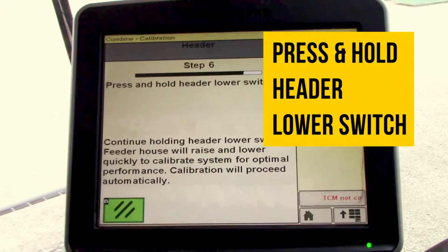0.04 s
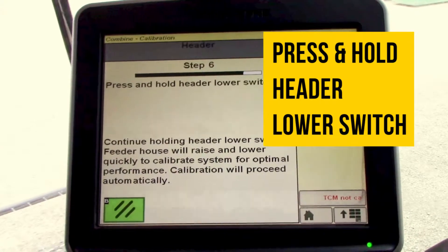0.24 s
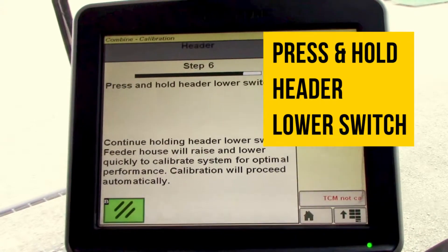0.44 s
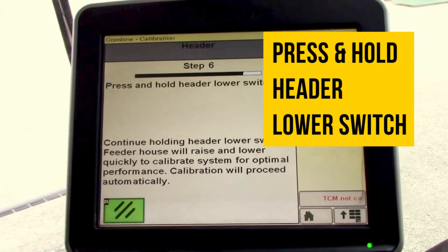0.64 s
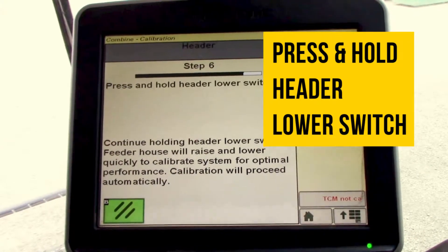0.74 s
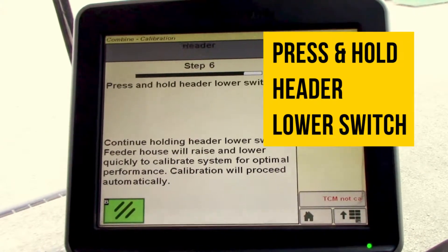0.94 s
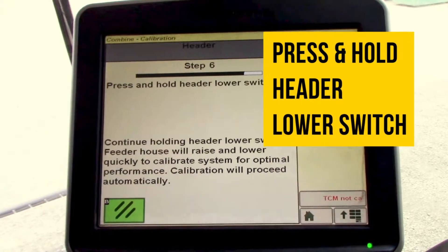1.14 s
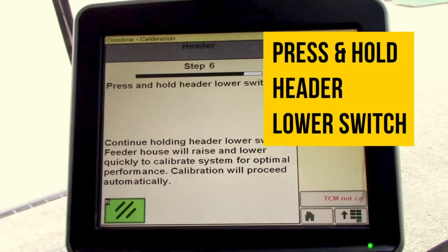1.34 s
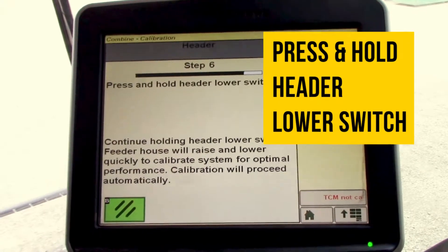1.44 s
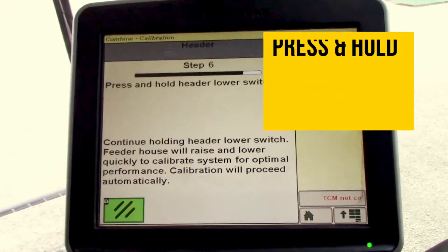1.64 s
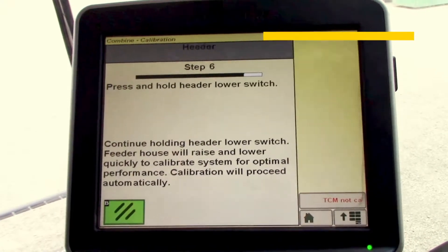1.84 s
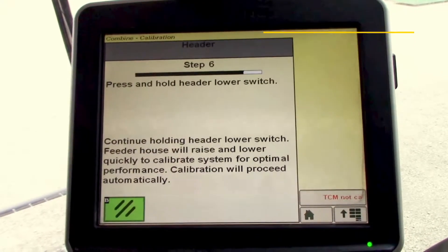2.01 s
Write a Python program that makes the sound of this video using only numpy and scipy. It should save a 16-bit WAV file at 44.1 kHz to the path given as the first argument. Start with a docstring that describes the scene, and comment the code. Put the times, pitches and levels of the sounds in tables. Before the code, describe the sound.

A big diesel engine drones at high idle throughout, booming and rumbling around a microphone inside a closed harvester cab. Pump and gears whine steadily over a mechanical roar, with occasional short panel rattles and faintly sizzling trim.

```python
"""Two seconds inside a combine harvester's closed cab, its six-cylinder diesel at high idle.
From the start the firing note booms over a rumble, a hydraulic pump and gears whine, and
machinery roars and throbs with the engine, making loose trim sizzle faintly. From 0.3 s the
panels shudder now and then, hardest at 1.6 s. At 1.8 s the boom swells most, and the gain
control, which evens the swells all along, turns everything down for a moment."""
import sys
import numpy as np
from scipy import signal
from scipy.fft import rfft, irfft, next_fast_len
from scipy.io import wavfile
from scipy.ndimage import map_coordinates

SR = 44100
rng = np.random.default_rng(int(sys.argv[2]) if len(sys.argv) > 2 else 0)


def unload_audio(sound):
    """Save the sound as a 16-bit wav file, at the path given as the first command line argument."""
    columns = np.transpose(np.atleast_2d(sound))
    # keep every value between -1 and 1, then stretch to whole-number steps
    steps = np.round(np.clip(columns, -1, 1) * 32767)
    wavfile.write(sys.argv[1], SR, steps.astype(np.int16))


N = 91331
CYCLE_HZ = 19.485  # in one engine cycle all six cylinders fire once

# Swells of the bass, before scaling: t/s, level/dB
BASS_SWELLS = [(0.0, -31), (0.08, -16.5), (0.29, -27), (0.32, -15.5), (0.37, -14.5), (0.42, -37),
               (0.44, -22.5), (0.48, -13), (0.54, -28.5), (0.63, -14.5), (0.66, -30), (0.78, -21),
               (0.81, -37.5), (0.9, -15.5), (0.94, -30), (1.0, -14), (1.22, -31), (1.24, -19.5),
               (1.37, -23.5), (1.45, -14.5), (1.48, -32), (1.52, -15.5), (1.56, -19), (1.64, -46),
               (1.67, -15.5), (1.71, -17), (1.73, -30.5), (1.77, -19), (1.8, -4.5), (1.83, -31),
               (1.92, -23.5), (1.94, -26.5), (2.05, -20.5), (2.07, -17)]
# Pitch of the firing note: t/s, f/Hz
FIRING_PITCH = [(0, 113), (.11, 119), (.19, 100), (.24, 98), (.28, 120), (.35, 117), (.4, 105), (.44, 119),
                (.55, 108), (.6, 121), (.84, 114), (.95, 127), (1.03, 112), (1.17, 118), (1.35, 114),
                (1.39, 125), (1.47, 111), (1.54, 118), (1.63, 105), (1.73, 102), (1.79, 124), (1.88, 104),
                (1.94, 124), (2.02, 105), (2.07, 117)]
def firing_note(swell_share=.75):
    """The cylinders fire so fast that they blend into one deep, wavering note."""
    bass_db = curve(BASS_SWELLS)
    note_db = bass_db.mean() + swell_share * (bass_db - bass_db.mean())
    phase = 2 * np.pi * np.cumsum(curve(FIRING_PITCH)) / SR
    return np.sqrt(2) * amp(note_db - .5) * np.sin(phase)


# The engine's steady tones: multiples of the cycle rate
HUM_MULTIPLES = [4, 5, 8, 9, 12, 15, 24, 48, 90]
# Strength of each tone: level/dB
HUM_LEVELS = [-49.5, -31, -34.5, -37.5, -34, -46, -46, -66.5, -58]
def engine_hum():
    """The engine repeats its motion every cycle, so it hums at multiples of that rate."""
    return sum(tone(k * CYCLE_HZ, db) for k, db in zip(HUM_MULTIPLES, HUM_LEVELS))


# Colour (how strong each pitch is) of the deep rumble: f/Hz, level/dB
RUMBLE_COLOUR = [(20, -40), (50, -38.5), (72, -16.5), (90, -9), (110, -11), (130, 1), (150, -9.5),
                 (220, -55), (500, -69), (2000, -130)]
# Colour of the panels' higher rumble: f/Hz, level/dB
PANEL_COLOUR = [(90, -30.5), (130, -10), (150, 4), (166, -7.5), (177, -1.5), (195, -8), (235, -9.5),
                (280, -12), (350, -22.5), (500, -30.5), (1000, -77), (3000, -130)]
# Rise and fall of the panels' rumble: t/s, level/dB
PANEL_SWELLS = [(0.0, -26.5), (0.27, -22.5), (0.29, -18), (0.32, -23), (0.38, -37), (0.41, -16.5),
                (0.48, -32), (0.51, -20), (0.55, -39), (0.59, -18), (0.67, -21), (0.7, -40.5),
                (0.74, -18.5), (0.86, -16.5), (0.88, -24.5), (1.0, -29), (1.03, -25), (1.08, -21),
                (1.31, -22.5), (1.34, -31), (1.38, -18.5), (1.44, -40.5), (1.48, -16), (1.52, -47.5),
                (1.57, -32), (1.59, -23.5), (1.79, -26), (1.83, -21), (2.01, -29), (2.07, -21)]
def cab_rumble():
    """The diesel fills the cab with a deep rumble, and the panels rumble above it."""
    deep = amp(curve(BASS_SWELLS).mean() - 6) * noise(RUMBLE_COLOUR)
    panels = amp(curve(PANEL_SWELLS) - 3) * even(noise(PANEL_COLOUR), span_s=.1)
    return deep + panels


# The pump's tones, lowest first: level/dB
PUMP_LEVELS = [-33.5, -48.5, -52, -61.5]
def pump(hz=330.7):
    """The hydraulic pump whines at one pitch and its whole multiples."""
    return sum(tone(k * hz, db) for k, db in enumerate(PUMP_LEVELS, 1))


# Rise and fall of the main whine: t/s, level/dB
MAIN_WHINE = [(0, -39.5), (.5, -40), (.85, -36), (1.05, -40), (1.25, -35), (1.6, -42), (1.72, -41.5),
              (2.07, -44.5)]
# The steady whines: f/Hz, level/dB
STEADY_WHINES = [(219.4, -38), (676.8, -45.5), (849.5, -50.5), (1498.6, -49.5), (1696, -59.5),
                 (2104.5, -58.5), (3395, -64.5)]
def gears_and_belts(main_hz=749.3):
    """Spinning gears and belts whine, each at its own pitch."""
    return tone(main_hz, curve(MAIN_WHINE)) + sum(tone(hz, db) for hz, db in STEADY_WHINES)


# Rise and fall of the roar's lower part: t/s, level/dB
LOW_ROAR_SWELLS = [(0.0, -36), (0.03, -28), (0.06, -34), (0.18, -28.5), (0.22, -36.5), (0.27, -29),
                   (0.37, -35.5), (0.46, -28), (0.47, -40), (0.58, -27.5), (0.62, -37), (0.64, -28.5),
                   (0.94, -32), (1.03, -38.5), (1.22, -27.5), (1.26, -36.5), (1.3, -27), (1.32, -42),
                   (1.38, -29.5), (1.55, -38.5), (1.6, -28.5), (1.7, -33.5), (1.71, -31), (1.97, -33),
                   (2.03, -39.5), (2.07, -37)]
# Its colour: f/Hz, level/dB
LOW_ROAR_COLOUR = [(200, -17.5), (390, 1.5), (460, -2.5), (570, -7), (610, -3), (670, -1.5), (715, -9.5),
                   (780, -3.5), (860, -4), (925, -2), (965, -11), (1100, -21.5), (1600, -38.5),
                   (6000, -120)]
# Rise and fall of the roar's bright part: t/s, level/dB
BRIGHT_ROAR_SWELLS = [(0.0, -38.5), (0.21, -38), (0.21, -42), (0.28, -36.5), (0.33, -40), (0.34, -33.5),
                      (0.37, -45.5), (0.41, -36), (0.48, -42.5), (0.54, -35), (0.56, -38.5), (0.6, -33.5),
                      (0.61, -43.5), (0.65, -36.5), (0.75, -36), (0.77, -39), (0.81, -37.5), (0.97, -39),
                      (0.97, -36), (1.03, -43), (1.06, -40.5), (1.22, -36), (1.24, -42.5), (1.26, -33),
                      (1.29, -45.5), (1.31, -32), (1.33, -44.5), (1.41, -34), (1.43, -42), (1.47, -37),
                      (1.55, -42.5), (1.6, -35.5), (1.71, -40), (1.71, -40), (1.82, -39), (1.98, -37.5),
                      (2.0, -44.5), (2.07, -35.5)]
# Its colour: f/Hz, level/dB
BRIGHT_ROAR_COLOUR = [(500, -24.5), (1000, -12), (1600, -11), (2200, -11), (3000, -20), (3700, -24),
                      (5000, -33.5), (7500, -42.5), (10000, -49), (13000, -55), (15500, -61)]
def machinery(throb_db=.9, knock_db=.7, flutter_db=.7):
    """The roar throbs once a cycle, knocks every second firing and shakes the trim."""
    cycle = 2 * np.pi * CYCLE_HZ * clock()
    pulse_db = throb_db * np.cos(cycle) + knock_db * np.cos(3 * cycle) + flutter_db * wobble(90)
    low_db = curve(LOW_ROAR_SWELLS) + pulse_db
    bright_db = curve(BRIGHT_ROAR_SWELLS) + pulse_db
    low = amp(low_db - 1.28) * even(noise(LOW_ROAR_COLOUR), span_s=.1)
    bright = amp(bright_db + .27) * noise(BRIGHT_ROAR_COLOUR)
    return low + trim_sizzle(bright_db) + glass_echoes(bright)


def glass_echoes(x, count=10, share=.39, within_s=.012):
    """Quick, weak echoes off the cab's glass boost some high pitches and weaken others."""
    delay_s = rng.uniform(.00033, 1, count) * within_s
    sign = rng.choice([-1, 1], count)
    echoes = lambda hz: np.exp(-2j * np.pi * np.outer(hz, delay_s)) @ sign / np.sqrt(count)
    return filtered(x, lambda hz: 1 + share * hz / (hz + 2000) * echoes(hz))


# Peak of each shudder: t/s, level/dB
SHUDDER_PEAKS = [(0.283, -28), (.8, -33), (0.938, -28.5), (1.295, -29), (1.607, -23)]
# Colour of the rattle: f/Hz, level/dB
RATTLE_COLOUR = [(150, -25), (235, 4), (340, -1.5), (480, -14.5), (680, -7), (900, -15.5), (1300, -19.5),
                 (2200, -26), (6000, -51.5), (12000, -100)]
def panel_shudders(width_s=.019):
    """Now and then the panels rattle harder for a moment."""
    swell = sum(amp(db) * np.exp(-.5 * ((clock() - s) / width_s) ** 2) for s, db in SHUDDER_PEAKS)
    return swell * even(noise(RATTLE_COLOUR), span_s=.017)


# Pitches at which the trim rings: f/Hz, width/Hz, relative level/dB
TRIM_RINGS = [(6046, 150, 9.5), (7000, 280, -1), (7870, 450, 2), (8990, 300, -1.5), (10660, 350, 1),
              (12580, 300, 3), (13200, 800, -12)]
def trim_sizzle(roar_db, follow=.91, grain_db=4.5, level_db=-66):
    """Loose trim rings faintly as it is shaken, more when the roar is louder."""
    shake_db = follow * (roar_db - roar_db.mean()) + grain_db * wobble(400)
    shake = amp(shake_db) * rng.standard_normal(N)
    def ringing(hz):
        return sum(amp(db) * (1j * hz * width / (pitch ** 2 - hz ** 2 + 1j * hz * width)) ** 2
                   for pitch, width, db in TRIM_RINGS)
    return amp(level_db) * unit(filtered(shake, ringing))


def amp(db):
    return 10 ** (np.asarray(db) / 20)


def unit(x):
    """x scaled to an average strength (rms) of 1."""
    return x / np.sqrt(np.mean(x ** 2) + 1e-20)


def clock():
    return np.arange(N) / SR


def curve(rows):
    """Straight lines joining (time, value) rows."""
    return np.interp(clock(), *np.transpose(rows))


def wobble(rate):
    """A smooth curve through `rate` random points a second."""
    return map_coordinates(rng.standard_normal(int(N * rate / SR) + 4), [clock() * rate])


def filtered(x, response):
    """x with each frequency scaled by response(hz)."""
    size = next_fast_len(N + SR // 4)
    return irfft(rfft(x, size) * response(np.fft.rfftfreq(size, 1 / SR)), size)[:N]


def noise(colour):
    """Noise of strength 1 in the given colour."""
    f, db = np.transpose(colour)
    response = lambda hz: amp(np.interp(np.log(hz + 1), np.log(f), db))
    return unit(filtered(rng.standard_normal(N), response))


def even(x, span_s):
    """x with its slow swells evened out, at strength 1."""
    window = signal.windows.hann(int(span_s * SR))
    power = np.abs(signal.fftconvolve(x ** 2, window, 'same'))
    return unit(x / np.sqrt(power + 1e-9))


def tone(hz, db, waver_rad=.41, waver_db=1.82):
    """A tone that wavers a little in pitch and loudness."""
    phase = 2 * np.pi * (hz * clock() + rng.random()) + waver_rad * wobble(6.56)
    return np.sqrt(2) * amp(db + waver_db * wobble(13)) * np.sin(phase)


def scene():
    """Everything as heard at one spot in the cab."""
    engine = firing_note() + engine_hum() + cab_rumble()
    return (engine + pump() + gears_and_belts() + machinery() + panel_shudders())[None]


def record(dry, ceiling_db=-15, sense_s=.022, fade_s=.003, top_hz=15720):
    """Fast gain control turns everything down when the bass swells; the highest treble is cut."""
    x = amp(-.55) * dry[0]
    window = signal.windows.hann(int(sense_s * SR))
    power = np.abs(signal.fftconvolve(x ** 2, window / window.sum(), 'same'))
    gain = (1 + (power / amp(ceiling_db) ** 2) ** 2) ** -.25
    fades = np.minimum(1, np.minimum(clock(), clock()[::-1]) / fade_s)
    return filtered(x * gain * fades, lambda hz: hz < top_hz)[None]


dry = scene()
out = record(dry)
unload_audio(out)
```